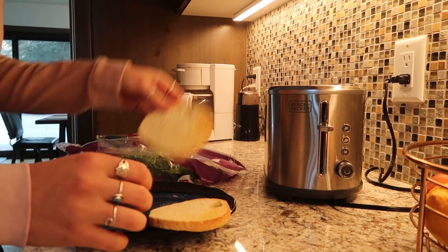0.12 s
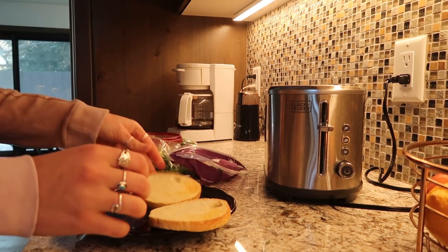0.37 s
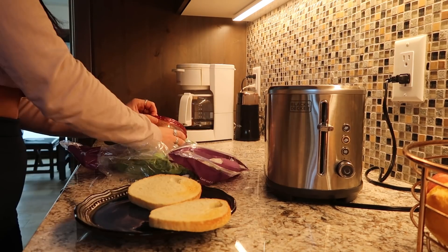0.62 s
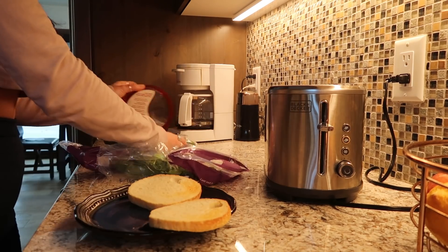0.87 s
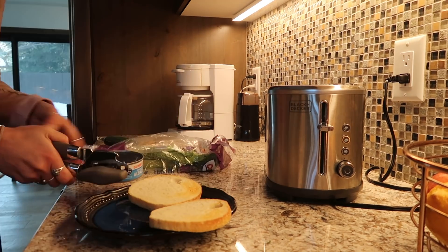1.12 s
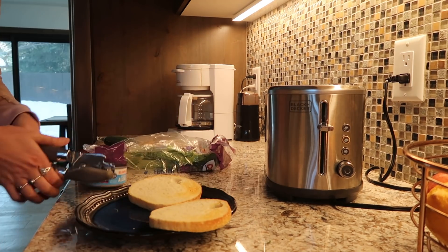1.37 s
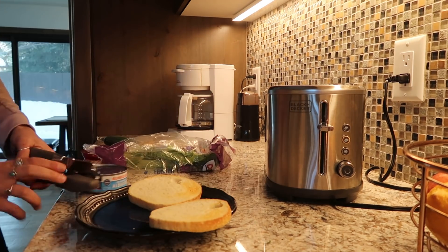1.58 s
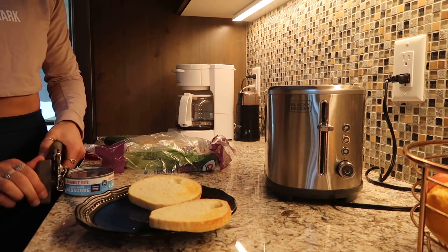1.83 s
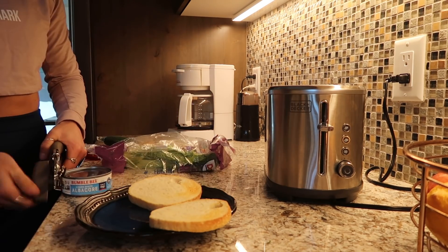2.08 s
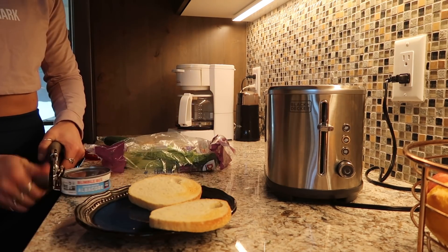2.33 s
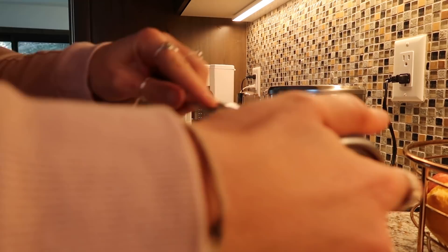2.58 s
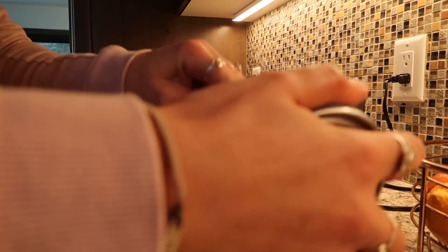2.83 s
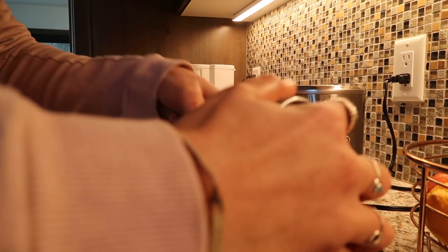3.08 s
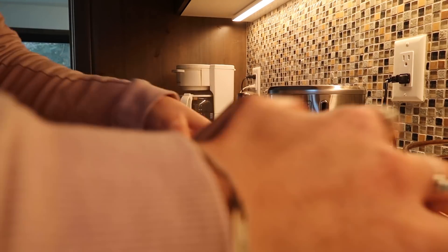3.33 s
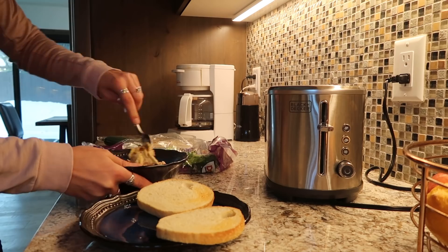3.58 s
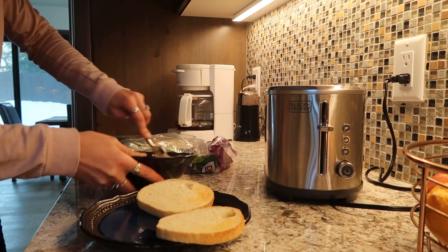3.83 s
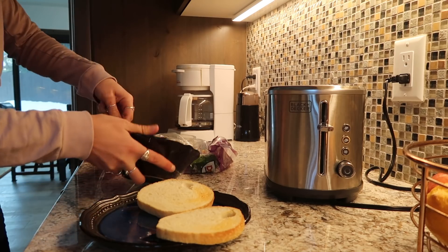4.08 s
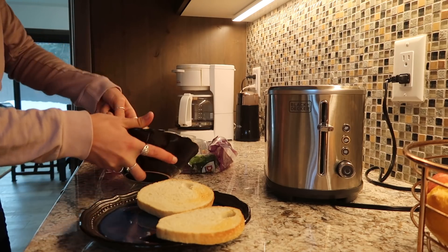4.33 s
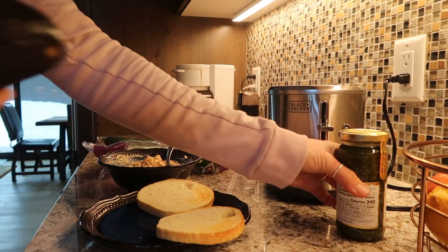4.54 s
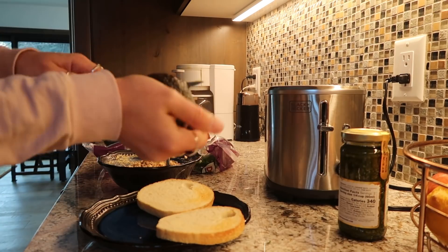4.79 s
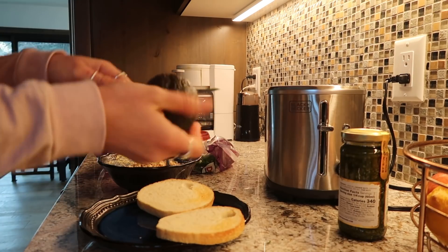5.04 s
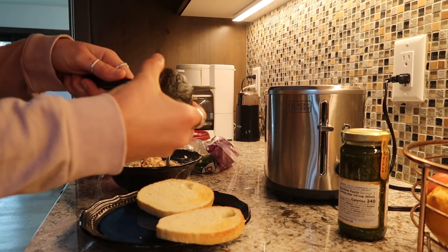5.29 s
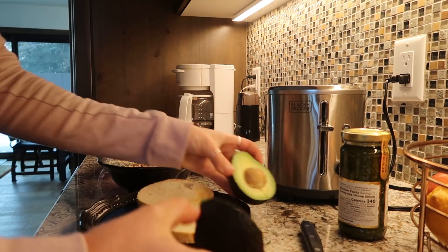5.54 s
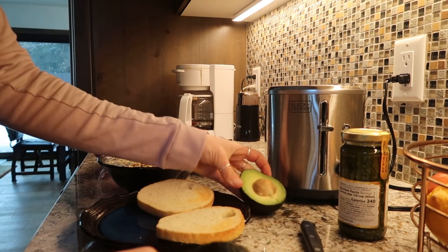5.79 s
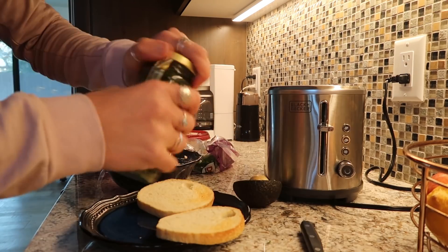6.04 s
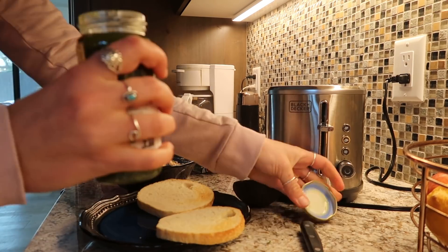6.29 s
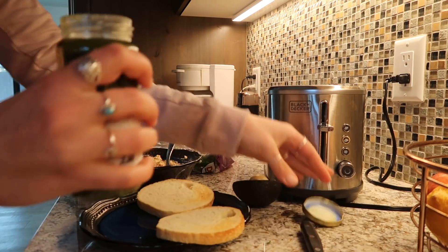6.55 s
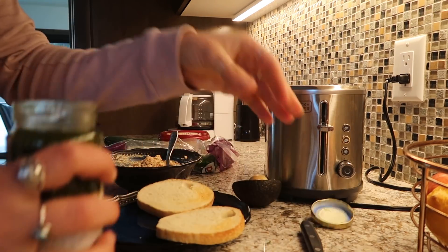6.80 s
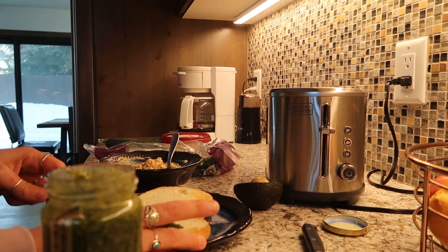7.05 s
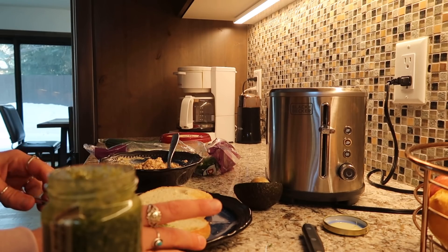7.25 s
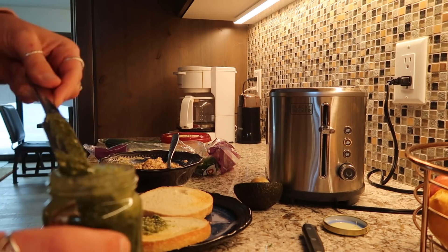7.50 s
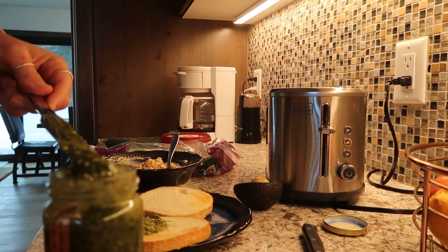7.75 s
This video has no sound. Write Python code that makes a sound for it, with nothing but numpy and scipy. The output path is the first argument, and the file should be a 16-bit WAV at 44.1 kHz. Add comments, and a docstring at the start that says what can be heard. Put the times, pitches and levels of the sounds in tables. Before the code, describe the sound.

Close kitchen-counter handling in abrupt fragments: plate knocks, tin clatter, opener snap and grinding, fork scrapes, jar thunk, knife and lid rattles, spoon strokes.

```python
"""Hands at work on a kitchen counter

A plate, a tin and its opener, a fork in a bowl, a glass jar, a knife, a metal lid and a spoon sound
at a stone counter. Noise-like knocks and gritty rubs pass through a clack and dying tones for each thing.
The counter booms and rumbles; shaped noise makes the room air and fridge hum, a sine a faint low tone.
Hard walls answer with echoes; at a few moments all but this background stops dead.
Two close microphone ports hear it."""
import sys
import numpy as np
from scipy import signal
from scipy.fft import rfft, irfft, next_fast_len
from scipy.io import wavfile
from scipy.ndimage import uniform_filter1d, map_coordinates

SR = 44100
rng = np.random.default_rng(int(sys.argv[2]) if len(sys.argv) > 2 else 0)


def field_ratio(decibels):
    """Amplitude ratio for a level in dB (20 dB per decade); scalars and array-likes work."""
    return 10 ** (np.asarray(decibels, dtype=float) / 20)


def inscribe(sig):
    """Save sig as 16-bit PCM at rate SR to the path in sys.argv[1].

    A 1-D sig is mono; a 2-D sig holds one channel per row.
    Samples are clipped to [-1, 1] before scaling.
    """
    pcm = np.round(np.clip(np.atleast_2d(sig).T, -1, 1) * 32767)
    wavfile.write(sys.argv[1], SR, pcm.astype(np.int16))


N = 347949  # length in samples

# Moments when knocks, rubs, booms and echoes stop dead: time_s
STOPS = [0.18, 1.055, 4.728, 6.353, 6.979, 7.563]

# In every modes table, t60_s is the time to fade by 60 dB; values under 0.01 s count as 0.01 s.
# Still room air, tone colour: pitch_hz, relative_level_db
AIR = [(28, -46.5), (40, -9), (204, -2.5), (256, -8), (312, -3.5), (6170, -26.5), (13400, -40.5),
       (16000, -74)]
# Room air, loudness over time: time_s, level_db
AIR_LEVEL = [(0, -48.5), (3.3, -51.5), (7.9, -50.5)]
# Fridge hum, fuzzy bands: pitch_hz, width_hz, level_db
HUM = [(100, 21, -60.5), (169.4, 12, -57.5), (202.7, 16, -52.5), (315.4, 37, -59.5)]
# Faint low tone early on: time_s, pitch_hz, level_db
DRONE = [(0, 380, -49.5), (.48, 388, -52.5), (.56, 385, -69)]
# The counter is leaned on and the rumble swells: start_s, rise_s, hold_s, level_db
SWAY = (1.46, .05, .25, -46)
# Likeness of background at the two ports: pitch_hz, likeness (no unit, limited to 0 to 1)
ALIKE = [(60, 1.65), (240, 0.78), (950, 0.43), (3770, -0.33), (15000, -5.5)]
# Plate, knocks: start_s, level_db, tilt_db_per_octave, contact_s
PLATE_KNOCKS = [(0.014, -11, -1.5, 0.044), (0.078, -16, 3.5, 0.025), (0.137, -25.5, 5, 0.038),
                (0.174, -25, 4, 0.015), (0.268, -38, 12.5, 0.016), (0.358, -32, 4.5, 0.018),
                (0.468, -35.5, 3, 0.056), (0.495, -27.5, 4, 0.045)]
# Plate, colour of its clack: pitch_hz, relative_level_db
PLATE_COLOUR = [(88, -44), (150, -8), (2100, 0), (2650, -18.5), (3270, -14.5), (15000, -43.5)]
# Plate, ringing modes: pitch_hz, relative_level_db, t60_s
PLATE_MODES = [(727, -8.5, 0.33), (1300, 8.5, 0.0072), (2108, -4, 0.27), (3250, -3, 0.037),
               (4510, -11, 0.073), (5400, -27, .1)]
# Kitchen walls, how long echoes last: pitch_hz, t60_s
KITCHEN = [(100, 0.23), (500, 0.33), (2000, 0.42), (6000, 0.34), (14000, 0.14)]
# Likeness of echoes at the two ports: pitch_hz, likeness (no unit)
ECHO_ALIKE = [(60, 1), (500, 1), (1500, 0.97), (3500, 0.65), (8000, 0.085)]
# Tin, knocks: start_s, level_db, tilt_db_per_octave, contact_s
TIN_KNOCKS = [(.542, -12.5, 5, 0.093), (.558, -1.5, 3.5, 0.089), (.59, -11.5, 0.5, 0.043),
              (.738, -12, 2.5, 0.065), (.757, -9, -0.5, 0.065), (.782, 0.5, 1, 0.034),
              (.798, -3, 2.5, 0.03), (.874, -16.5, 2.5, 0.065), (.89, -27, 3, 0.024),
              (.983, -22.5, 4, 0.11), (1.008, -18.5, 1, 0.084), (1.506, -3.5, -2, 0.034),
              (2.757, -16, 3.5, 0.022)]
# Tin, colour of its clack: pitch_hz, relative_level_db
TIN_COLOUR = [(59, -32), (100, -9.5), (718, 4.5), (1350, -5), (1770, -5), (4180, -22), (15000, -56)]
# Tin, ringing modes: pitch_hz, relative_level_db, t60_s
TIN_MODES = [(312, -20.5, 0.019), (706, -2.5, 0.024), (840, -8, 0.11), (1770, -23, 0.072)]
# Counter booms under a blow: start_s, level_db, pitch_hz, t60_s
THUDS = [(1.011, -23.5, 116.5, 0.11), (1.507, -29.5, 178, 0.27), (2.781, -27.5, 188, 0.047),
         (6.152, -19.5, 100, 0.054), (7.695, -27, 159, 0.15)]
# Opener, knocks: start_s, level_db, tilt_db_per_octave, contact_s
OPENER_KNOCKS = [(1.124, -28, -2, 0.045), (1.139, -7.5, -4.5, 0.016), (1.142, 0.5, -2.1, 0.018),
                 (1.149, -17.5, -3, 0.017)]
# Opener, colour of its clack: pitch_hz, relative_level_db
OPENER_COLOUR = [(150, -28.5), (560, -5.5), (1050, -14), (2000, -0.5), (2700, -12), (4000, -14),
                 (7000, -20.5), (15000, -23)]
# Opener, ringing modes: pitch_hz, relative_level_db, t60_s
OPENER_MODES = [(580, -14.5, 0.052), (1850, -25, 0.044), (2060, -15, 0.18), (2052, 9, 0.0568),
                (3214, -4, 0.071)]
# Rim snapping under the cutting wheel: start_s, level_db, tilt_db_per_octave, contact_s
WHEEL_KNOCKS = [(1.947, -17.5, 1, 0.017), (2.323, -37, 5, 0.0066), (2.394, -16, 0, 0.023),
                (2.415, -26, -4, 0.014), (2.468, -33, 6.5, 0.012), (2.499, -26, 1, 0.01)]
# Turns of the cutting wheel: start_s, rise_s, hold_s, level_db, focus_hz
WHEEL_RUB = [(1.881, 0.011, .02, -45, 163), (1.933, 0.11, 0.01, -19, 183),
             (2.321, 0.0088, 0.064, -33, 166.5), (2.371, 0.033, 0.1, -25, 140)]
# Cutting wheel, colour of its clack: pitch_hz, relative_level_db
WHEEL_COLOUR = [(29, -36), (50, -21.5), (135, -5.5), (174, 5.5), (248, -3), (998, -8.5), (7580, -37.5),
                (12200, -48.5), (14000, -104)]
# Cutting wheel, ringing modes: pitch_hz, relative_level_db, t60_s
WHEEL_MODES = [(108, 0.5, 0.1), (169.2, -9.5, 0.27), (470, -17, 0.056), (970, -14.5, .08)]
# Cut lid, knock: start_s, level_db, tilt_db_per_octave, contact_s
PEEL_KNOCKS = [(2.776, -5.5, 1, 0.02)]
# Pulls at the cut lid: start_s, rise_s, hold_s, level_db, focus_hz
PEEL_RUB = [(2.798, 0.069, 0.034, -38, 1470), (2.961, 0.012, 0.055, -38, 915),
            (2.98, 0.022, 0.035, -36, 3250), (3.057, 0.034, 0.032, -37, 1970),
            (3.103, 0.0094, 0.05, -38.5, 2660), (3.168, 0.028, 0.059, -43, 2000)]
# Cut lid, colour of its clack: pitch_hz, relative_level_db
PEEL_COLOUR = [(300, -35.5), (700, -23.5), (900, -3), (1400, -7.5), (3100, -9.5), (9500, -17.5),
               (12000, -24.5), (15000, -35)]
# Cut lid, ringing modes: pitch_hz, relative_level_db, t60_s
PEEL_MODES = [(921, -5, 0.11), (1134, -7, 0.055), (1525, -10.5, 0.07), (1938, -8, 0.032),
              (2140, -16, 0.045), (2660, -11, 0.2), (3160, -14, 0.082), (3626, -8, 0.028),
              (5170, -9, 0.016)]
# Bowl, knocks: start_s, level_db, tilt_db_per_octave, contact_s
BOWL_KNOCKS = [(3.553, -27, -7, 0.035), (3.645, -39, -11, 0.034), (3.902, -8.5, 1.5, 0.078),
               (4.298, -34, 0, 0.036), (4.345, -26.5, 15, 0.015), (4.42, -31, -8.5, 0.082)]
# Fork strokes in the bowl: start_s, rise_s, hold_s, level_db, focus_hz
BOWL_RUB = [(3.468, 0.027, 0.025, -54, 2880), (3.894, 0.032, 0.19, -36.5, 2180),
            (4.127, 0.038, 0.2, -39, 2080), (4.14, 0.014, 0.062, -53, 4000),
            (4.28, .03, 0.034, -43.5, 3350), (4.329, .02, 0.036, -48.5, 4000),
            (4.818, 0.11, 0.0095, -53.5, 2590)]
# Bowl, colour of its clack: pitch_hz, relative_level_db
BOWL_COLOUR = [(120, -42), (200, -18), (560, -11.5), (659, -8), (1880, -14), (5760, -29), (15000, -44.5)]
# Bowl, ringing modes: pitch_hz, relative_level_db, t60_s
BOWL_MODES = [(623, -1.5, 0.046), (1157, 5, 0.012), (1850, -1.5, 0.015), (2385, -13.5, 0.068),
              (3350, -22, 0.047), (4000, -9.5, 0.086), (5850, -12, 0.04)]
# Fork digging into the food: start_s, level_db, tilt_db_per_octave, contact_s
SCUFF_KNOCKS = [(3.807, -21.5, 8, 0.038)]
# Fork scuffing through the food: start_s, rise_s, hold_s, level_db, focus_hz
SCUFF_RUB = [(3.797, 0.012, 0.058, -34, 840)]
# Glass jar, knocks: start_s, level_db, tilt_db_per_octave, contact_s
JAR_KNOCKS = [(4.531, 5, 0.5, 0.013), (6.059, -31.5, 14.5, 0.015), (6.145, -13.5, 23.5, 0.082),
              (6.155, -12, -1.5, 0.025), (7.637, -36.5, 0, 0.015), (7.696, -9, -1, 0.053)]
# Glass jar, colour of its clack: pitch_hz, relative_level_db
JAR_COLOUR = [(29, -12), (50, -29.5), (531, 7), (1380, 5.5), (2220, -1), (3420, -18.5), (11800, -73.5),
              (15000, -100)]
# Glass jar, ringing modes: pitch_hz, relative_level_db, t60_s
JAR_MODES = [(384, -7, 0.18), (520, -4, 0.09), (784, 3, 0.0087), (1000, -10, 0.14), (1460, -8, 0.1),
             (1750, -13, 0.044), (2080, -2.5, 0.052), (4200, -30, 0.12)]
# Knife, knocks: start_s, level_db, tilt_db_per_octave, contact_s
KNIFE_KNOCKS = [(5.661, -9, 1, 0.078), (5.678, -1.5, -1, 0.039), (5.69, -9.5, -3, 0.039),
                (5.704, -28, 1.5, 0.018)]
# Knife, colour of its clack: pitch_hz, relative_level_db
KNIFE_COLOUR = [(35, -55), (60, -37), (332, -10.5), (2110, -1), (3200, -18), (4020, -30), (7000, -36),
                (15000, -136)]
# Knife, ringing modes: pitch_hz, relative_level_db, t60_s
KNIFE_MODES = [(403, -9.5, 0.04), (971, -10.5, 0.13), (1350, -12, 0.056), (2160, -25, 0.077),
               (3070, -2, 0.11), (4730, -9.5, 0.039), (5000, -23, 0.085), (6780, -19.5, 0.049),
               (9200, -30, 0.033)]
# Metal lid, knocks: start_s, level_db, tilt_db_per_octave, contact_s
LID_KNOCKS = [(6.393, -2.5, 0.5, 0.036), (6.445, -10, 0.1, 0.06), (6.5, -11.5, 1.5, 0.054),
              (6.63, -16.5, 1.5, 0.14), (6.672, -16, -1.5, 0.1), (6.76, -12, 0.3, 0.076),
              (6.878, -16, 1, 0.12)]
# Lid rim grinding as it rocks: start_s, rise_s, hold_s, level_db, focus_hz (here a dip, not a peak)
LID_RUB = [(6.398, 0.044, 0.13, -38.5, 2800)]
# Metal lid, colour of its clack: pitch_hz, relative_level_db
LID_COLOUR = [(150, -69), (250, -27), (919, -19.5), (1950, -17), (2800, -10.5), (9280, -32), (15000, -51)]
# Metal lid, ringing modes: pitch_hz, relative_level_db, t60_s
LID_MODES = [(937, -4, 0.078), (1360.6, -9.5, 0.28), (2180, -13.5, 0.21), (2782, -7, 0.21),
             (2880, 6, 0.096), (3990, -2, 0.061), (4330, -1, 0.21), (5500, -1, 0.03), (6910, -14, .12),
             (7230, -24, 0.34), (8980, -17.5, .04), (9540, -18, 0.19), (11600, -10, 0.05)]
# Spoon, knocks: start_s, level_db, tilt_db_per_octave, contact_s
SPOON_KNOCKS = [(7.071, -24.5, -1, 0.023), (7.144, -18, -4.5, 0.048), (7.176, -20.5, -0.5, 0.059),
                (7.25, -22.5, 2, 0.031), (7.287, -13, -0.5, 0.02), (7.312, -19.5, 1.5, 0.039)]
# Spoon strokes inside the jar: start_s, rise_s, hold_s, level_db, focus_hz
SPOON_RUB = [(7.055, 0.014, .1, -34, 1410), (7.138, 0.069, 0.13, -26, 1290),
             (7.451, 0.012, 0.07, -42.5, 1750)]
# Spoon, colour of its clack: pitch_hz, relative_level_db
SPOON_COLOUR = [(35, -60), (60, -6), (204, -10.5), (251, -13.5), (1490, -4), (10900, -27), (13700, -34),
                (15000, -47)]
# Spoon, ringing modes: pitch_hz, relative_level_db, t60_s
SPOON_MODES = [(1300, -6, 0.064), (1690, -11, 0.13), (2180, -12, 0.041)]

SIZE = 16384  # samples for working out a body's response
BITE_DB, EASE_DB_PER_S, LET_GO_DB = 21.5, 64, 29.5  # a stroke's rise, sag while held, and fade
LUCK_DB, CLUMP_DB = 2.5, 2.5  # scatter of mode strengths, depth of the clumps in a rub
RUMBLE_DB, RUMBLE_FADE_S = -62, 0.3  # steady rumble level, fade of its swell


def unit(x):
    """Scale to an rms of 1."""
    return x / np.sqrt(np.mean(x ** 2) + 1e-20)


def along(points, hz):
    """Read a curve of (pitch_hz, value) points on a log pitch axis."""
    f, value = np.transpose(points)
    return np.interp(np.log(hz + 1), np.log(f + 1), value)


def level(points):
    """Gain per sample from (time_s, level_db) points, silent outside them."""
    t = np.arange(N) / SR
    return field_ratio(np.interp(t, *np.transpose(points), left=-150, right=-150))


def filtered(x, response):
    """Shape x by a response that depends on frequency."""
    m = next_fast_len(x.shape[-1] + 8192)
    spectrum = rfft(x, m) * response(np.fft.rfftfreq(m, 1 / SR))
    return irfft(spectrum, m)[..., :x.shape[-1]]


def diffuse(white, alike):
    """Mix two noises so that the ports agree in the bass and differ in the treble."""
    def shares(hz):
        turn = np.arccos(np.clip(along(alike, hz), 0, 1)) / 2
        return np.array([np.cos(turn), np.sin(turn)])
    mid, side = filtered(white, shares)
    return np.array([mid + side, mid - side])


def wobble(step):
    """A smooth random curve with a knot every step samples."""
    return map_coordinates(rng.standard_normal(N // step + 4), [np.arange(N) / step])


def samples_until_stop(s):
    """Samples from time s to the next stop, or to the end."""
    return round((min(c for c in STOPS + [N / SR] if c > s) - s) * SR)


def stroke(s, rise, hold, db, release):
    """Pressure of one stroke: it bites in, eases slowly while held and lets go."""
    corners = s + np.cumsum(np.abs([0, rise, hold, release]))
    held = db - EASE_DB_PER_S * hold
    return level(np.transpose([corners, [db - BITE_DB, db, held, held - LET_GO_DB]]))


def blow(contact):
    """A rattling contact whose strength jumps every 1.5 ms, driving all frequencies nearly alike."""
    t = np.arange(SIZE // 4) / SR
    rattle_db = 3.3 * np.repeat(rng.standard_normal(len(t) // 64), repeats=64)
    shape = field_ratio(rattle_db - 60 * t / contact) * (1 - np.exp(-t / (0.19 * contact)))
    push = shape * rng.standard_normal(len(t))
    # by turns even out the spectrum and restore the loudness shape
    for _ in range(6):
        z = rfft(push)
        even = irfft(z / (np.abs(z) + 1e-12))
        push = shape * even / np.sqrt(np.abs(uniform_filter1d(even ** 2, size=48)) + 1e-20)
    return push


def body(colour, modes, ring_db, spread, lean):
    """Response of a thing to a tap: a dull clack plus dying modes, both coloured by lean(hz) in dB."""
    hz, t = np.fft.rfftfreq(SIZE, 1 / SR), np.arange(SIZE // 2) / SR
    # fold the cepstrum forward in time (minimum phase), so the clack starts at once
    cepstrum = irfft(np.log(field_ratio(along(colour, hz) + lean(hz)) + 1e-6))
    cepstrum[1:SIZE // 2] *= 2
    cepstrum[SIZE // 2 + 1:] = 0
    clack = irfft(np.exp(rfft(cepstrum)))[:SIZE // 2]
    # nothing is quite round: every mode is three close tones that beat, struck at new strengths
    f, db, t60 = np.repeat(np.transpose(modes), repeats=3, axis=1)[:, :, None]
    detune, luck = rng.standard_normal((2, *f.shape))
    # where it is struck favours whole clusters
    luck = luck + np.repeat(rng.standard_normal((len(modes), 1)), repeats=3, axis=0)
    fade = field_ratio(db + lean(f) + LUCK_DB * luck - 60 * t / np.maximum(t60, 0.01))
    ring = fade * np.sin(2 * np.pi * f * (1 + spread * detune) * t)
    clack_size = np.linalg.norm(field_ratio(along(colour, hz))) / np.sqrt(len(hz))
    return clack + field_ratio(ring_db) * ring.sum(0) * clack_size


def thing(knocks, rubs, colour, modes, ring_db, lag, pan_db, release=0.092, grit_db=3, focus_db=12,
          spread=0.0125, roam_db=6, focus_octaves=0.42):
    """Short rattling knocks and gritty rubs sound through the same body; lag is in samples."""
    out = np.zeros(N + SIZE)
    for s, db, tilt_db, contact in knocks:
        response = body(colour, modes, ring_db, spread, lambda f: tilt_db * np.log2((f + 50) / 1000))
        knock = signal.fftconvolve(blow(max(contact, 0.002)), response)
        knock = field_ratio(db) * knock / np.abs(knock).max()
        knock = knock[:samples_until_stop(s)]
        out[round(s * SR):][:len(knock)] += knock
    for s, rise, hold, db, centre in rubs:
        grit = field_ratio(grit_db * wobble(128) + CLUMP_DB * wobble(1024))  # uneven: 3 ms grain, 23 ms clumps
        start, span = round(s * SR), min(samples_until_stop(s), SR)
        pressure = stroke(s, rise, hold, db, release)[start:start + span]
        stream = (grit * rng.standard_normal(N))[start:start + span] * pressure
        stream = stream * np.linalg.norm(pressure) / np.linalg.norm(stream)

        def focus(f):
            return focus_db * np.exp(-(np.log2((f + 1) / centre) / focus_octaves) ** 2)
        # the point of contact roams over three spots, each of which wakes the modes differently
        shares = field_ratio(roam_db * np.array([wobble(2048)[:span] for _ in range(3)]))
        for share in shares / np.linalg.norm(shares, axis=0):
            response = body(colour, modes, ring_db, spread, focus)
            response = response / np.linalg.norm(response)
            out[start:start + span] += signal.fftconvolve(share * stream, response)[:span]
    side = np.array([[1], [-1]])

    def port(hz):
        # the ports differ slightly in loudness and arrival; small things send out no deep bass
        arrival = np.exp(-1j * np.pi * hz * side * lag / SR)
        return field_ratio(side * pan_db / 2) * arrival * (1j * hz / (110 + 1j * hz)) ** 2
    return filtered(np.array([out[:N]] * 2), port)


def background_noise(response):
    """Diffuse noise at both ports, shaped by a response and scaled to rms 1."""
    return unit(filtered(diffuse(rng.standard_normal((2, N)), ALIKE), response))


def room_air():
    """Still air as broad coloured noise whose level drifts."""
    return level(AIR_LEVEL) * background_noise(lambda hz: field_ratio(along(AIR, hz)))


def fridge_hum():
    """The fridge's fuzzy hum: noise gathered around a few low pitches."""
    return sum(field_ratio(db) * background_noise(lambda hz: 1 / (1 + ((hz - centre) / width * 2) ** 2))
               for centre, width, db in HUM)


def low_tone():
    """A faint low sine early on that slides slightly in pitch."""
    s, hz, db = np.transpose(DRONE)
    cycles = np.cumsum(np.interp(np.arange(N) / SR, s, hz)) / SR
    return np.sqrt(2) * level(np.transpose([s, db])) * np.sin(2 * np.pi * cycles)


def counter_rumble():
    """Deep noise through the counter, which swells as it is leaned on."""
    strength = field_ratio(RUMBLE_DB) + stroke(*SWAY, release=RUMBLE_FADE_S)
    return strength * background_noise(lambda hz: (hz / 40) ** 4 / (1 + (hz / 40) ** 7))


def plate():
    """Knocks wake the plate's clack and ringing modes."""
    return thing(PLATE_KNOCKS, [], PLATE_COLOUR, PLATE_MODES, ring_db=-36.0, spread=0.0043,
                 lag=1.0, pan_db=-1.0)


def kitchen(x):
    """The walls' answer: noise in which each frequency dies at its own speed, a new tail every time."""
    hz, t, z = signal.stft(rng.standard_normal((2, SR // 2)), SR, nperseg=256)
    fade = field_ratio(-60 * t / along(KITCHEN, hz)[:, None])
    tail = diffuse(signal.istft(z * fade, SR, nperseg=256)[1], ECHO_ALIKE)
    late = np.pad(x, (200, 0))[None]  # starts 200 samples late
    return signal.fftconvolve(late, tail / np.linalg.norm(tail[0]), axes=1)


def tin():
    """Rattling knocks wake the tin's low, short modes."""
    return thing(TIN_KNOCKS, [], TIN_COLOUR, TIN_MODES, ring_db=-31.0, lag=0.89, pan_db=-2.2)


def thuds():
    """Low booms of the counter slab: dying sines, alike at both ports."""
    out, t = np.zeros(N + SR), np.arange(SR // 2) / SR
    for s, db, hz, t60 in THUDS:
        boom = field_ratio(db - 60 * t / t60) * np.sin(2 * np.pi * hz * t) * (1 - np.exp(-t / 0.0035))
        boom = boom[:samples_until_stop(s)]
        out[round(s * SR):][:len(boom)] += boom
    return out[:N]


def opener():
    """A close burst of knocks makes the opener clack and ring."""
    return thing(OPENER_KNOCKS, [], OPENER_COLOUR, OPENER_MODES, ring_db=-43.0, lag=1.0, pan_db=0.3)


def cutting_wheel():
    """The wheel grinds in low strokes while the rim snaps under it."""
    return thing(WHEEL_KNOCKS, WHEEL_RUB, WHEEL_COLOUR, WHEEL_MODES, ring_db=-39.5, grit_db=3.0,
                 release=0.072, lag=1.0, pan_db=0.0)


def peeled_lid():
    """A knock, then pulls at the cut lid, each strongest around its own pitch."""
    return thing(PEEL_KNOCKS, PEEL_RUB, PEEL_COLOUR, PEEL_MODES, ring_db=-32.5, focus_db=14,
                 focus_octaves=0.21, grit_db=1.0, release=0.1, spread=0.0122, lag=1.43, pan_db=-2.0)


def fork_in_bowl():
    """Fork knocks and strokes sound through the bowl."""
    return thing(BOWL_KNOCKS, BOWL_RUB, BOWL_COLOUR, BOWL_MODES, ring_db=-32.5, focus_octaves=0.24,
                 grit_db=1.0, release=0.029, lag=1.0, pan_db=-0.7)


def fork_in_food():
    """The fork digs into the food: the bowl's clack with very little ring."""
    return thing(SCUFF_KNOCKS, SCUFF_RUB, BOWL_COLOUR, BOWL_MODES, ring_db=-49, release=0.046,
                 lag=0.96, pan_db=-0.7)


def glass_jar():
    """Knocks wake the jar's clack and modes."""
    return thing(JAR_KNOCKS, [], JAR_COLOUR, JAR_MODES, ring_db=-40.0, lag=0.8, pan_db=-1.4)


def knife():
    """A quick run of knocks wakes the knife's widely spread modes."""
    return thing(KNIFE_KNOCKS, [], KNIFE_COLOUR, KNIFE_MODES, ring_db=-34, spread=0.028,
                 lag=1.0, pan_db=-1.5)


def metal_lid():
    """The lid knocks and rings as it rocks; its rim grinds, with a dip at the focus pitch."""
    return thing(LID_KNOCKS, LID_RUB, LID_COLOUR, LID_MODES, ring_db=-34.0, focus_db=-15,
                 spread=0.0062, grit_db=3, lag=1.52, pan_db=-1.9)


def spoon_in_jar():
    """The spoon knocks and strokes inside the jar."""
    return thing(SPOON_KNOCKS, SPOON_RUB, SPOON_COLOUR, SPOON_MODES, ring_db=-30, spread=0.023,
                 focus_db=3.0, grit_db=3.0, release=0.13, lag=1.0, pan_db=-0.3)


def scene():
    """Mix things, echoes and background; echoes are drawn anew for each short stretch."""
    dry = plate() + tin() + thuds() + opener() + cutting_wheel() + peeled_lid()
    dry = dry + fork_in_bowl() + fork_in_food() + glass_jar() + knife() + metal_lid() + spoon_in_jar()
    wet = np.zeros((2, N))
    ends = [round(s * SR) for s in STOPS] + [N]
    edges = sorted(set(ends + list(range(0, N, SR // 4))))
    for start, stop in zip(edges, edges[1:]):
        end = min(e for e in ends if e >= stop)  # echoes stop dead here
        echo = kitchen(dry[:, start:stop].mean(0))[:, :end - start]
        wet[:, start:start + echo.shape[1]] += echo
    background = room_air() + fridge_hum() + low_tone() + counter_rumble()
    return dry + field_ratio(-6.0) * wet + background


def low_pass(x):
    """Removes everything above the highest recorded frequency."""
    return signal.sosfilt(signal.butter(12, 16490, fs=SR, output="sos"), x)


def record(dry):
    """Loud knocks clip softly."""
    clipped = dry / (1 + np.abs(dry) ** 8) ** (1 / 8)
    return low_pass(clipped)


dry = scene()
out = record(dry)
inscribe(out)
```